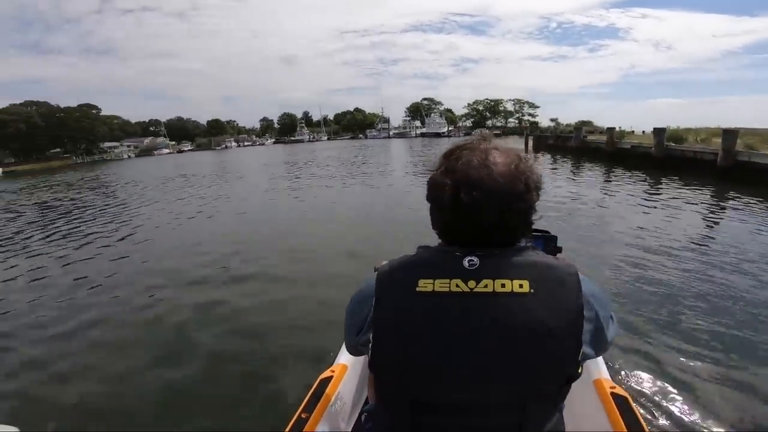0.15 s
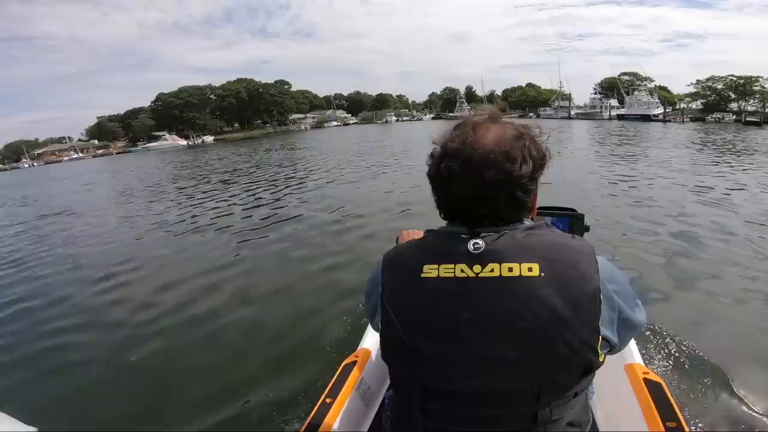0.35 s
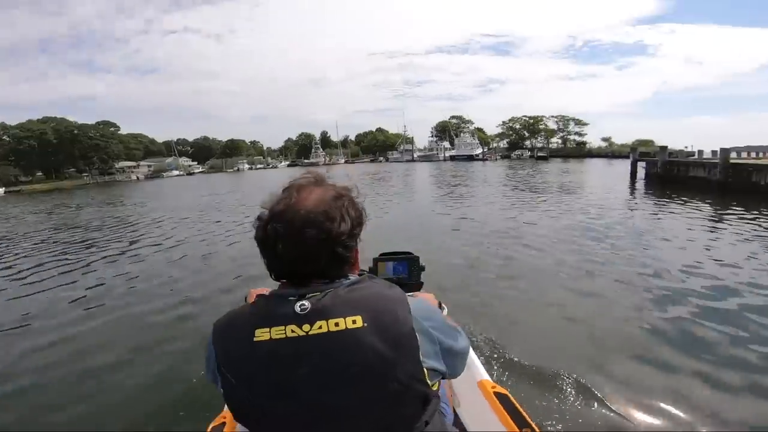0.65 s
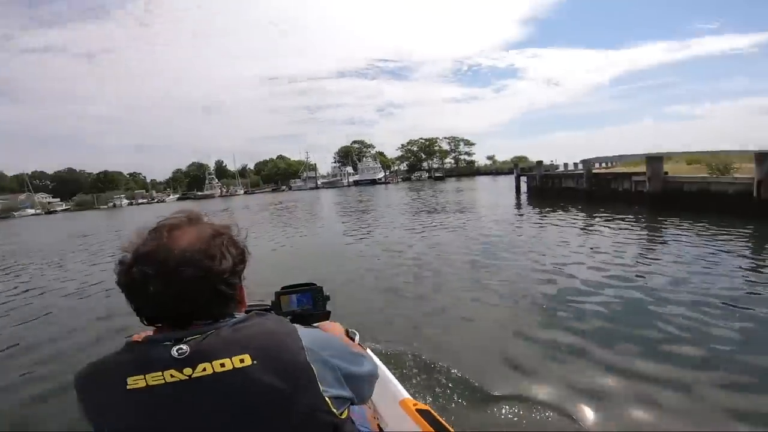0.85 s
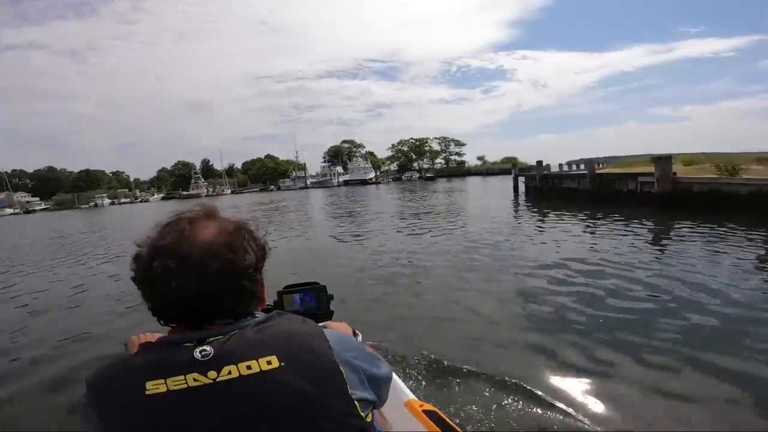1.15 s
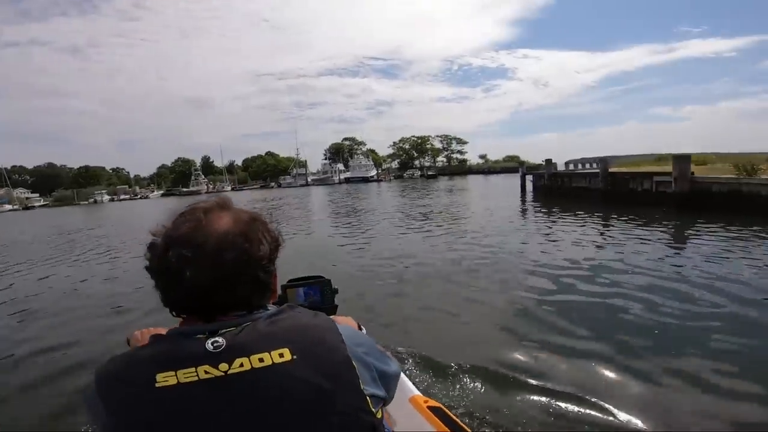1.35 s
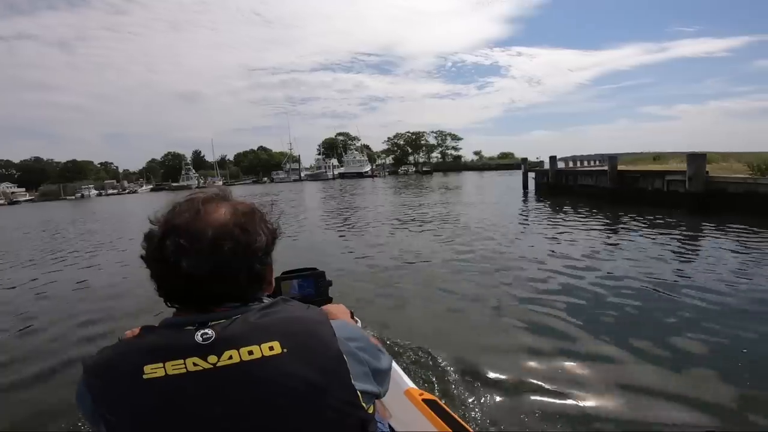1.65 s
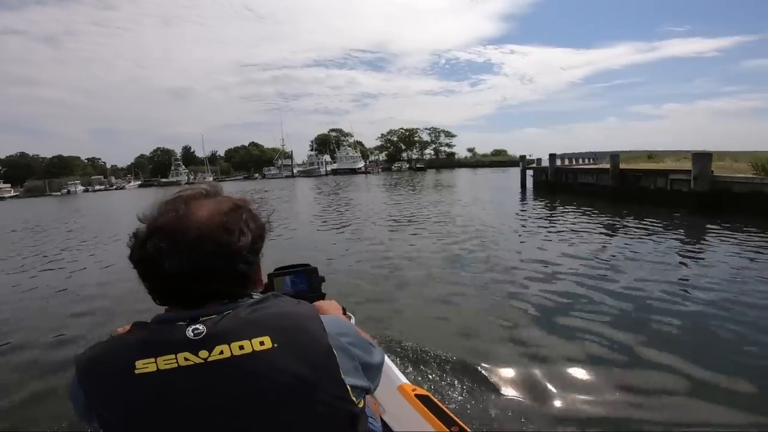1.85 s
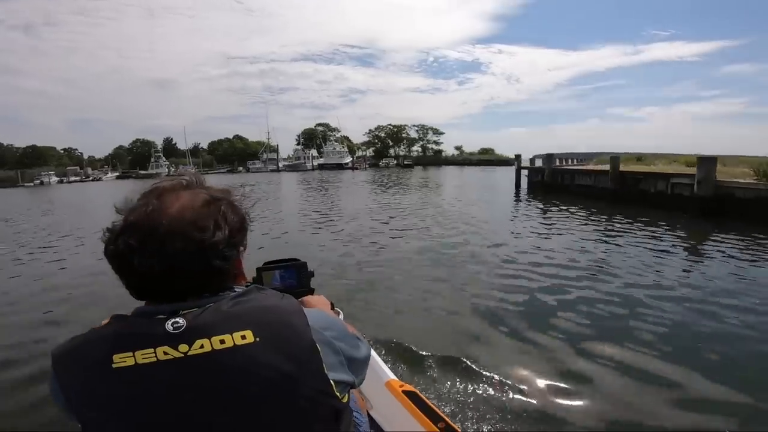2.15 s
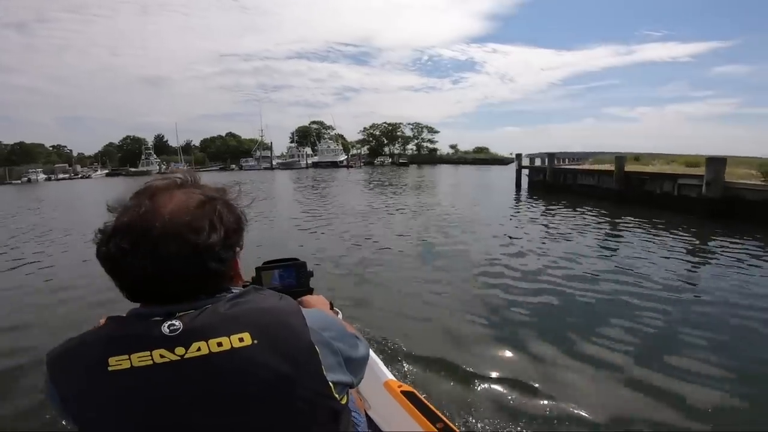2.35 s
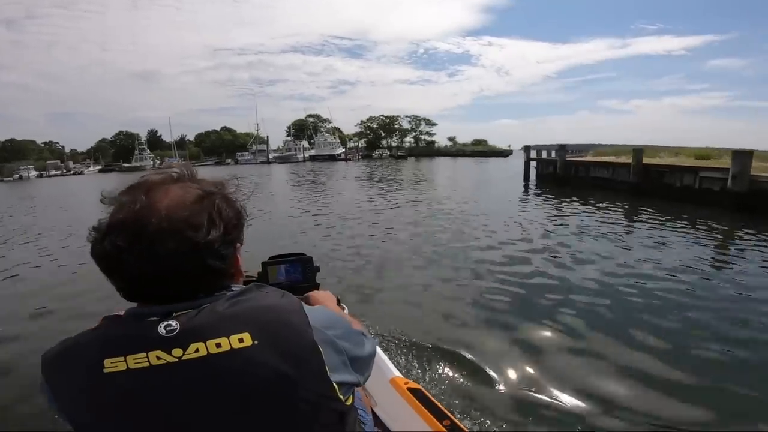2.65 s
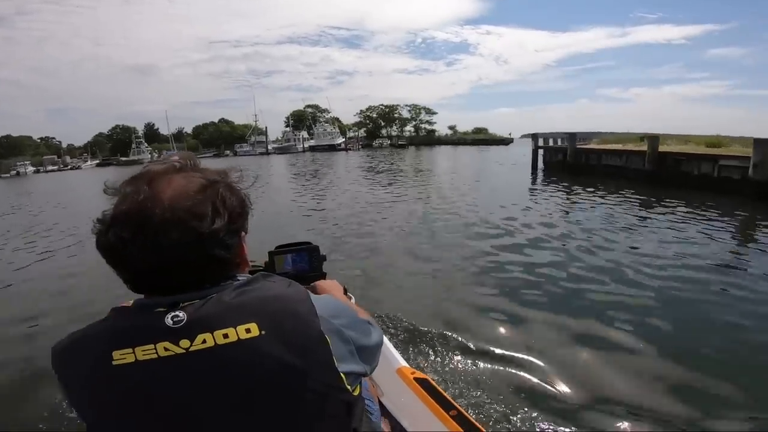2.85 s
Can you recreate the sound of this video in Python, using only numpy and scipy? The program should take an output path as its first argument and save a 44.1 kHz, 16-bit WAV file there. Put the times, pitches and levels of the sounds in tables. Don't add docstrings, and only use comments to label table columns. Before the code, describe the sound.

A watercraft engine idles with a steady, low, wet burble in wide stereo, with soft wash and small splashes until 0.4 s. It cuts hard to near silence, then fades in from about 0.6 s, centred and rougher. Water gurgles and a bow wave rushes around 0.75-1.05 s. Bubbles, droplets and dull hull thuds continue; from 2.25 s the engine pulses louder, with a deep watery slap near 2.7 s.

```python
import sys
import numpy as np
from scipy import signal
from scipy.fft import rfft, irfft
from scipy.io import wavfile
from scipy.ndimage import uniform_filter1d

SR = 44100
rng = np.random.default_rng(int(sys.argv[2]) if len(sys.argv) > 2 else 0)


def materialize(psi):
    bounded = np.clip(np.atleast_2d(psi).T, -1, 1)
    quanta = np.round(bounded * 32767).astype(np.int16)
    wavfile.write(sys.argv[1], SR, quanta)


def nominal_scale(level):
    x = np.asarray(level, float) / 20
    return 10 ** x


N = 132300
OPPOSITE = np.array([[1], [-1]])


def evened(x):
    return x / np.sqrt(np.mean(x ** 2) + 1e-20)


def seconds():
    return np.arange(N) / SR


def over_time(points, t):
    return np.interp(t, *np.transpose(points))


def read(points, hz):
    f, value = np.transpose(points)
    return np.interp(np.log(hz + 1), np.log(f + 1), value)


def slow(rate_hz, count=24):
    t = np.arange(0, N + 64, 64) / SR
    rates = np.geomspace(rate_hz / 12, rate_hz, count)
    drift = sum(np.sin(2 * np.pi * (f * t + rng.random())) / np.sqrt(f) for f in rates)
    return np.interp(seconds(), t, evened(drift))


# frequency in Hz, correlation -1..1.
SAME = [(60, 0.77), (200, 0.3), (370, 1), (690, 0.06), (1270, -0.12), (2330, 0.01), (4300, -0.2),
        (8000, -0.12), (14000, -0.2)]


def hiss(points, patchy_db, flicker_db):
    frames, hz = N // 128 + 5, np.fft.rfftfreq(512, 1 / SR)
    a, b, c, d, patches = rng.standard_normal((frames, 257, 5)).T
    patches = uniform_filter1d(patches, size=6, axis=0)
    patches = evened(uniform_filter1d(patches, size=14, axis=1))
    flicker = evened(uniform_filter1d(rng.standard_normal(frames), size=3))
    same = np.clip(read(SAME, hz), -1, 1)[:, None]
    left = a + 1j * b
    right = same * left + np.sqrt(1 - same ** 2) * (c + 1j * d)
    level_db = read(points, hz)[:, None] + patchy_db * patches + flicker_db * flicker
    z = np.array([left, right]) * nominal_scale(level_db)
    return evened(signal.istft(z, nperseg=512, noverlap=384)[1][:, :N])


def bubble(hz, cycles, glide):
    u = np.arange(0, 1, hz / (2 * cycles * SR))
    envelope = np.minimum(u / 0.086, 1) * np.exp(-5 * u)
    return envelope * np.sin(4 * np.pi * cycles * u * (1 + glide * u))


def engine(hz, pipe, cylinders_db, scatter_db, jitter_s, gurgle_db, lag_s):
    turns = np.cumsum(hz) / SR
    at = np.flatnonzero(np.diff(np.floor(turns)))
    k, draw = np.arange(len(at)), rng.standard_normal((200, 2))
    at = np.clip(at + np.round(draw[k, 0] * jitter_s * SR).astype(int), 0, N - 1)
    pulses = np.zeros(N)
    pulses[at] = nominal_scale(np.take(cylinders_db, k % 3) + scatter_db * draw[k, 1])
    puffs = (1.1 + np.exp(-(turns % 1) / 0.45)) * rng.standard_normal(N)
    f = np.fft.rfftfreq(N, 1 / SR)
    drag_s_per_hz, drag_top_hz = 9e-5, 400
    delay_s = lag_s + drag_s_per_hz * np.minimum(f, drag_top_hz)
    box = nominal_scale(read(pipe, f)) * np.exp(-2j * np.pi * np.cumsum(delay_s) * SR / N)
    bangs = evened(irfft(rfft(pulses) * box, N))
    gurgle = evened(irfft(rfft(puffs) * box, N))
    return evened(bangs + nominal_scale(gurgle_db) * gurgle), turns


# frequency in Hz, level in dB.
PIPE_WIDE = [(45, -22), (91, -11), (137, -2), (183, 0.1), (229, -3), (274, -12), (320, -13), (420, -26),
             (900, -45), (1500, -80), (2600, -120)]
CYLINDERS_WIDE_DB = [0, -2, -1]


def steady_engine():
    firing_hz = 45.75 * np.ones(N)
    motor, _ = engine(firing_hz, PIPE_WIDE, CYLINDERS_WIDE_DB, scatter_db=0.8, jitter_s=0.00015,
                      gurgle_db=-12.5, lag_s=-0.1245)
    return nominal_scale(-25.5) * motor


# frequency in Hz, level in dB.
RUMBLE = [(7.1, -51), (12, -13), (33, 4.5), (50, -2.5), (102, -4.5), (130, -9.5), (170, -13), (290, -120)]


def rumble():
    hz = abs(np.fft.fftfreq(16384, 1 / SR))
    log = np.log(nominal_scale(np.maximum(read(RUMBLE, hz), -100)))
    taps = np.fft.ifft(np.exp(log - 1j * signal.hilbert(log).imag)).real[:8192]
    low = signal.oaconvolve(rng.standard_normal(N), taps)[:N]
    return evened(low) * nominal_scale(0.5 * slow(25))


# frequency in Hz, level in dB.
WASH_WIDE = [(180, -18.5), (330, -15.5), (520, -16), (700, -20.5), (900, -18.5), (1500, -28), (9200, -54),
             (10600, -61), (14500, -75)]


def wide_wash():
    return nominal_scale(-37.5) * hiss(WASH_WIDE, 2.5, 1.0)


# frequency in Hz, level in dB.
SPRAY = [(880, -30), (1500, -7), (2290, -8), (2720, -8), (3820, -10), (5190, -13), (5890, -13), (9710, -15),
         (10800, -26), (14600, -33.5)]
# start in seconds, length in s, level in dB, rise in s, fall in s.
SPLASHES = [
    (0.0, 0.022, -43.5, 0.0015, 0.082),
    (0.088, 0.15, -53, 0.034, 0.027),
    (0.177, 0.015, -49.5, 0.0059, .015),
    (0.214, 0.017, -43.5, 0.021, 0.028),
    (0.372, 0.059, -50.5, 0.011, 0.014),
]


def splashes():
    t, level = seconds(), np.zeros(N)
    for s, length, db, rise, fall in SPLASHES:
        attack = np.clip((t - s) / rise, 0, 1)
        release = np.clip((s + length - t) / fall + 1, 0, 1)
        level += nominal_scale(db) * attack * release
    return level * hiss(SPRAY, 0.88, 0.36)


def sizzle():
    f, length_s = np.fft.rfftfreq(N, 1 / SR), 0.053
    centre_hz, width_hz = 5920, 500
    bell = np.exp(-2 * ((f - centre_hz) / width_hz) ** 2)
    band = evened(irfft(rfft(rng.standard_normal(N)) * bell, N))
    return nominal_scale(-51) * band * np.clip(2 * (1 - seconds() / length_s), 0, 1)


# start in seconds, pitch in Hz, level in dB, length in s.
GLUGS = [(.004, 5900, -42, 0.022), (0.019, 6100, -51, 0.016), (.02, 2130, -37, 0.016),
         (0.39, 2700, -35, 0.0089), (0.762, 526, -23, .03), (.786, 620, -23, .012),
         (0.807, 630, -24.5, 0.055), (0.876, 650, -28.5, 0.025), (0.834, 1580, -34.5, 0.011),
         (0.98, 1900, -36, .025), (1.029, 1850, -32, .03), (1.057, 1440, -32, 0.018),
         (1.567, 2470, -35, .025), (1.24, 2600, -42, 0.021), (1.41, 2200, -42, 0.026),
         (1.05, 2200, -42.5, .025), (2.635, 560, -22.5, 0.004), (2.08, 510, -26, .03),
         (2.714, 397, -15.5, 0.027), (2.764, 4500, -45, 0.0072)]


def glugs():
    out = np.zeros(N)
    for (s, hz, db, length), draw in zip(GLUGS, rng.random((len(GLUGS), 4, 2))):
        for late, detune in draw:
            cycles = np.clip(hz * length / 4, 3, 14)
            tone = nominal_scale(db) * bubble(hz * (0.92 + 0.16 * detune), cycles, 0.05)
            part = out[round((s + late * length) * SR):][:len(tone)]
            part += tone[:len(part)]
    return out


# start in seconds, pitch in Hz, level in dB, length in s.
THUDS = [(2.5, 264, -28, .16), (2, 250, -25, 0.15), (0.5, 111, -30, 0.073), (-0.5, 278, -24.5, 0.082),
         (.24, 290, -34, 0.14), (.33, 440, -36.5, 0.031), (0.349, 10.7, -25, 0.08), (.04, 26, -29, 0.076),
         (.3, 26, -27, 0.055), (1.065, 100, -25, 0.083), (1.515, 74, -22.5, 0.062), (1.53, 130, -25, 0.08),
         (1.62, 89, -26.5, 0.049), (2.056, 60, -28, 0.077), (2.248, 53, -24, 0.099)]


def thuds():
    t, out = seconds(), np.zeros(N)
    for s, hz, db, length in THUDS:
        swell = np.sin(np.pi * np.clip((t - s) / length, 0, 1)) ** 2
        out += nominal_scale(db) * swell * np.sin(2 * np.pi * hz * (t - s))
    return out


# frequency in Hz, left minus right in dB.
LEAN = [(60, -1.5), (180, -1.0), (540, -2), (1620, -3.0), (4850, -0.5), (14500, 2.5)]


def wide_view(slaps):
    low = nominal_scale(-34) * (rumble() + 0.22 * OPPOSITE * rumble())
    near_left = (slaps + sizzle()) * np.array([[1.2], [0.7]])
    mix = steady_engine() + low + wide_wash() + splashes() + near_left
    lean_db = read(LEAN, np.fft.rfftfreq(N, 1 / SR)) * OPPOSITE / 2
    return irfft(rfft(mix) * nominal_scale(lean_db), N)


# frequency in Hz, level in dB.
PIPE_MONO = [(60, -41.5), (112, -18), (136, -6), (160, 1), (183, 0), (205, 1.5), (228, -1), (250, 1),
             (274, -9), (310, -11.5), (480, -27), (1000, -120)]
CYLINDERS_MONO_DB = [0, -6, -3]
# time in seconds, firings in Hz.
REVS = [(.6, 45.7), (1.2, 45.7), (2.0, 45.65), (2.4, 45.3), (2.7, 45.6), (3.0, 46)]
# time in seconds, load in dB, brightness in dB above the 212 Hz split.
SPEED = [(0.65, -26.5, 1.5), (0.78, -24.5, -4), (0.849, -27, -1.8), (1.43, -23.5, 5.5), (1.46, -33, -9),
         (1.539, -26.5, -10), (1.61, -31, -8), (2.26, -25.5, 6), (2.28, -21.5, 4), (2.46, -22, 5),
         (2.49, -17.5, 2.5), (2.57, -23, 0), (2.75, -19, -4), (2.761, -22, 1.5), (2.94, -22.5, -1),
         (2.97, -19.5, -7)]
# time in seconds, level in dB.
DEEP = [(.6, -14), (.85, -4), (1.2, 0.5), (2.0, -1.5), (2.35, 1.5), (3.0, 1.5)]


def loaded_engine():
    t, f = seconds(), np.fft.rfftfreq(N, 1 / SR)
    s, load_db, bright_db = np.transpose(SPEED)
    load_db, bright_db = np.interp(t, s, load_db), np.interp(t, s, bright_db)
    motor, turns = engine(over_time(REVS, t), PIPE_MONO, CYLINDERS_MONO_DB, scatter_db=1.2,
                          jitter_s=0.0004, gurgle_db=-6.5, lag_s=0.0145)
    split_hz, deep_hz = 212, 155
    upper = irfft(rfft(motor) / (1 + (split_hz / (f + 1)) ** 12), N)
    deep = irfft(rfft(motor) / (1 + (f / deep_hz) ** 12), N)
    lower = motor - upper + (nominal_scale(over_time(DEEP, t)) - 1) * deep
    exhaust = nominal_scale(-bright_db / 2) * lower + nominal_scale(bright_db / 2) * upper
    thrum_db = -41 + 1.8 * t + 1.5 * slow(3.0)
    thrum = nominal_scale(thrum_db) * np.sqrt(2) * np.sin(2 * np.pi * turns)
    return nominal_scale(load_db) * exhaust + thrum


# frequency in Hz, level in dB.
WASH_MONO = [(180, -30), (300, 9), (360, -7.5), (572, -4.5), (900, -14), (2990, -27), (4500, -37),
             (5850, -68), (9900, -120)]
# time in seconds, level in dB.
WAKE = [(0.72, -48), (0.81, -44.5), (0.87, -44.5), (1.1, -41), (1.12, -43), (1.15, -42), (1.27, -43.5),
        (1.59, -41.5), (2.77, -41.5), (2.97, -42.5)]


def wake_wash():
    level_db = 7.5 + over_time(WAKE, seconds()) + 0.29 * slow(8.8)
    return nominal_scale(level_db) * hiss(WASH_MONO, 1.63, 1.0)[0]


# frequency in Hz, level in dB.
FIZZ = [(2650, -32), (4500, -5), (5830, -11.5), (7980, -12), (8890, -22), (10200, -25.5), (11000, -25),
        (13000, -32.5), (14500, -54)]


def foam_fizz():
    fizz = nominal_scale(-68.5 + 2.5 * seconds()) * hiss(FIZZ, 2.1, 1.0)
    leak = nominal_scale(-33 + 7 * slow(60)) * fizz[1]
    return fizz[0] + leak * OPPOSITE


def grains(lo_hz, hi_hz, per_s, cycles, spread_db, count=24):
    size = nominal_scale(spread_db * np.minimum(rng.exponential(1, N), 4))
    size = size * (rng.random(N) < per_s / SR)
    kind, out = rng.integers(0, count, N), np.zeros(N)
    for k, hz in enumerate(np.geomspace(lo_hz, hi_hz, count)):
        tone = bubble(hz, cycles, 0.42) * np.sqrt(lo_hz / hz)
        out += signal.oaconvolve(size * (kind == k), tone)[:N]
    return evened(out)


def bubbles_and_drops():
    bubbles = grains(536, 3500, per_s=590, cycles=1.9, spread_db=1.5)
    drops = grains(4100, 10500, per_s=25, cycles=16.0, spread_db=2.5)
    return nominal_scale(-50.5) * bubbles + nominal_scale(-87) * drops


# start in seconds, level in dB, pitch in Hz.
TICKS = [(0.668, -59, 6200), (.952, -63, 7750), (1.061, -62.5, 7350), (1.344, -58.5, 7800),
         (1.430, -64.5, 8900), (1.460, -57.5, 7320), (1.660, -64, 8500), (1.731, -66, 7800),
         (1.804, -58.5, 7430), (2.116, -55, 7760), (2.126, -64.5, 9500), (2.610, -63, 8950),
         (2.680, -64, 10000), (2.812, -61.5, 10400), (2.929, -59, 6770)]


def ticks():
    rise_s = 0.002
    out, t = np.zeros(N), np.arange(0, 6 * rise_s, 1 / SR)
    envelope = t / rise_s * np.exp(1 - t / rise_s)
    for (s, db, hz), draw in zip(TICKS, rng.standard_normal((len(TICKS), 2000))):
        smooth = uniform_filter1d(uniform_filter1d(draw, size=16), size=16)[:len(t)]
        burst = smooth * np.sin(2 * np.pi * hz * t)
        out[round(s * SR):][:len(t)] += nominal_scale(db - 2) * evened(burst) * envelope
    return out


# frequency in Hz, level in dB.
SWELL = [(900, -20.5), (1500, -5.5), (2000, 0), (2900, -4), (3400, -13), (4000, -5), (4800, -21.5),
         (5600, -44.5)]
# time in seconds, level in dB.
SWELL_DB = [(.68, -77), (.76, -52), (.84, -53), (.9, -55.5), (.97, -48.5), (1.01, -52.5), (1.06, -61),
            (1.12, -60.5), (1.3, -75.5)]


def bow_wave():
    return nominal_scale(over_time(SWELL_DB, seconds())) * hiss(SWELL, 2.0, 0.89)[0]


# time in seconds, band edge in Hz.
CEILING = [(.6, 4970), (.64, 8600), (.7, 11900), (.95, 12900), (1.9, 13200), (3.0, 13600)]


def ceiling(x):
    hz, t, z = signal.stft(x, SR, nperseg=2048)
    edge_hz = over_time(CEILING, t) + 250 * rng.standard_normal(len(t))
    return signal.istft(z * (hz[:, None] < edge_hz), SR, nperseg=2048)[1][..., :N]


def centred_view(slaps):
    water = wake_wash() + foam_fizz() + bubbles_and_drops() + bow_wave() + ticks()
    return ceiling(loaded_engine() + nominal_scale(-35) * rumble() + water + slaps)


def scene():
    t, slaps = seconds(), glugs() + thuds()
    cut_s, fall_s, remnant_s = 0.4005, 0.0015, 0.017
    fall = np.clip((cut_s - t) / fall_s, 0, 1)
    remnant = nominal_scale(-36) * np.clip(1 - (t - cut_s) / remnant_s, 0, 1)
    step = 0.045 * (1 - fall) * (t < cut_s)
    fade_start_s, fade_s = 0.58, 0.1
    fade = np.clip((t - fade_start_s) / fade_s, 0, 1) ** 1.46
    return np.maximum(fall, remnant) * wide_view(slaps) + step + fade * centred_view(slaps)


def band_limit(x):
    return signal.sosfilt(signal.butter(12, 15130, fs=SR, output="sos"), x)


def record(dry):
    limit = 0.49
    return band_limit(limit * np.tanh(dry / limit))


dry = scene()
out = record(dry)
materialize(out)
```